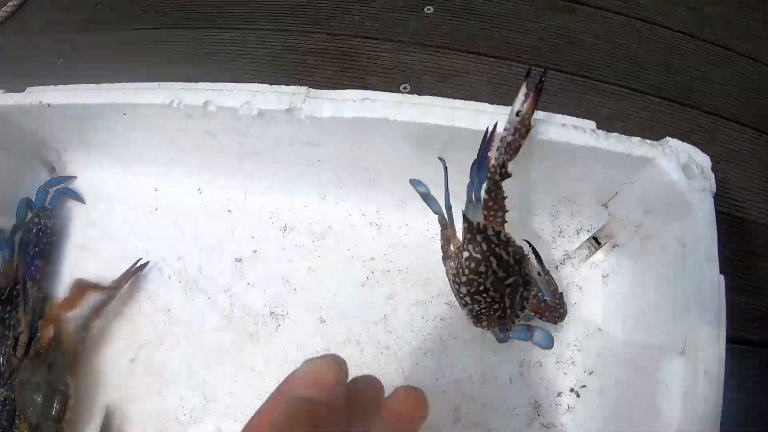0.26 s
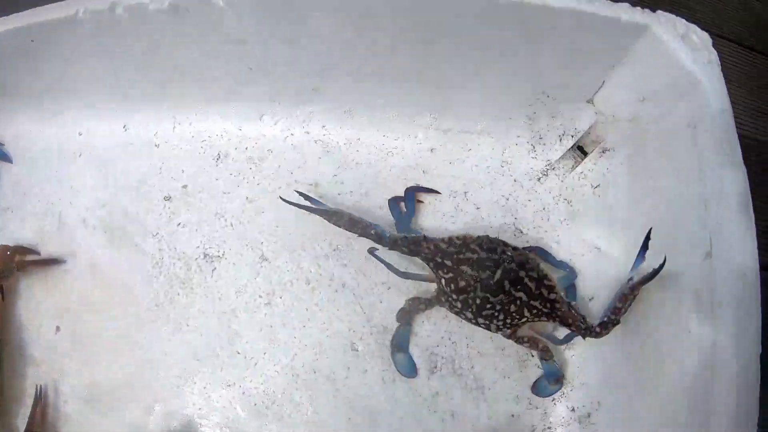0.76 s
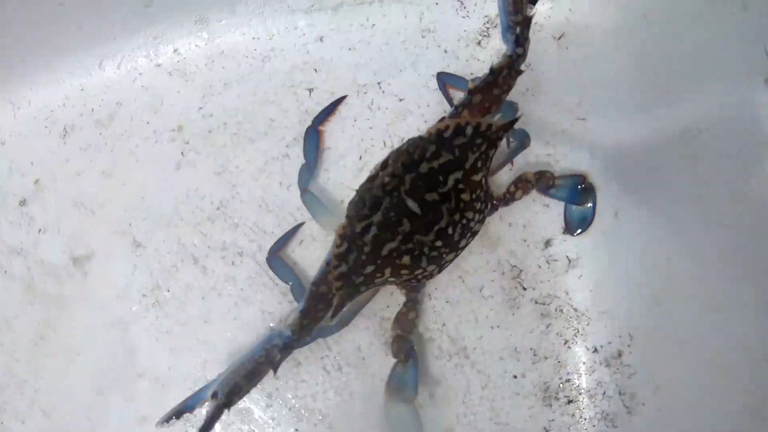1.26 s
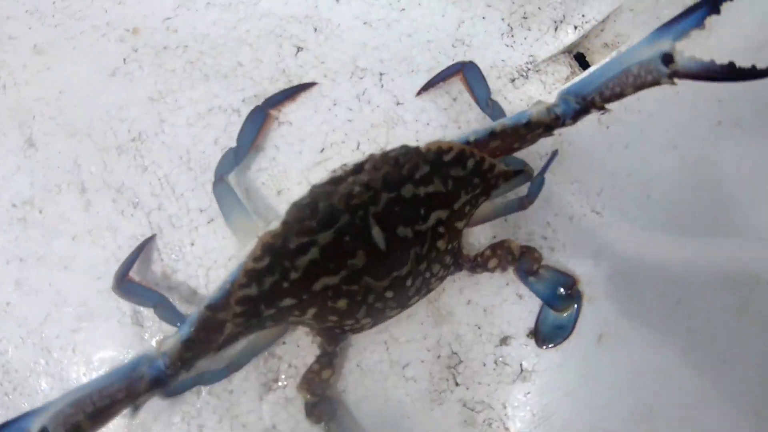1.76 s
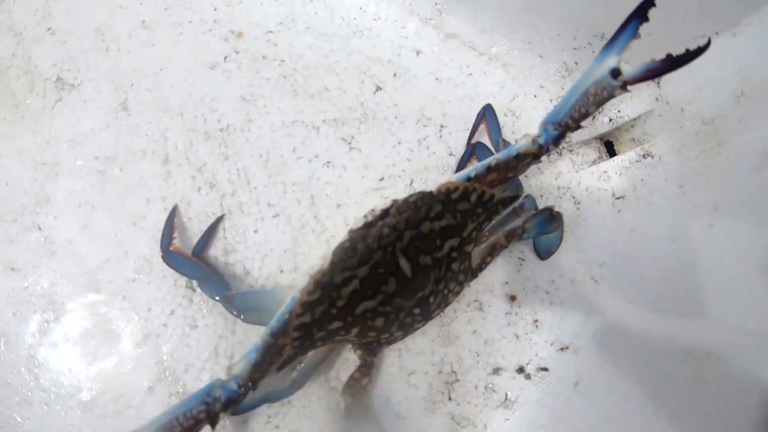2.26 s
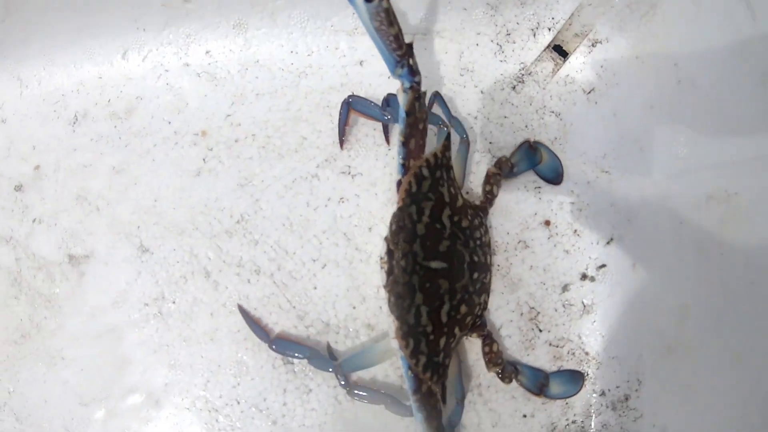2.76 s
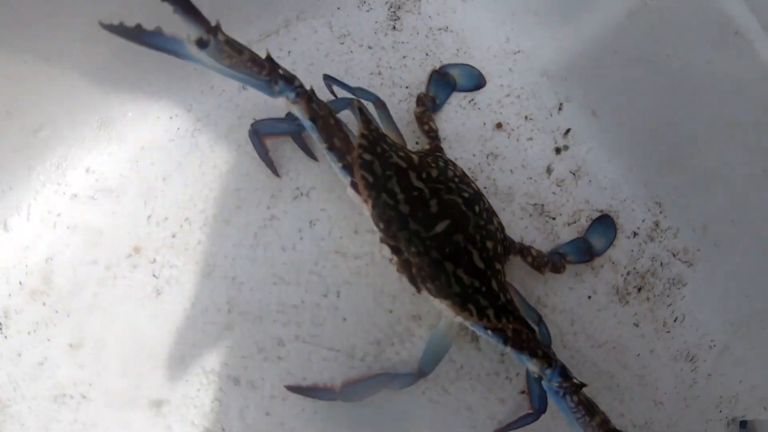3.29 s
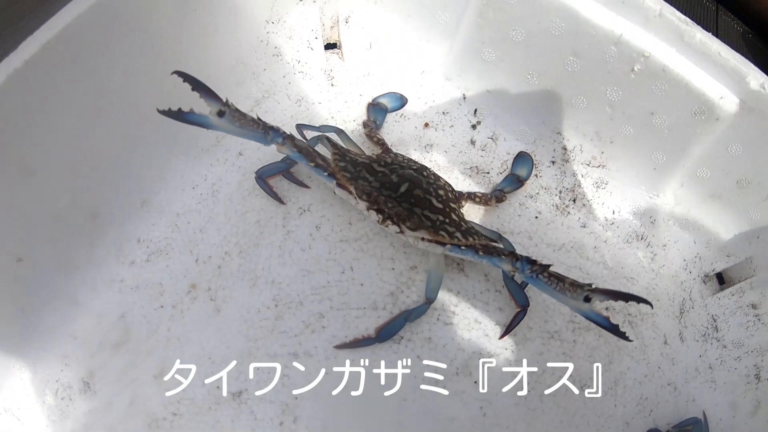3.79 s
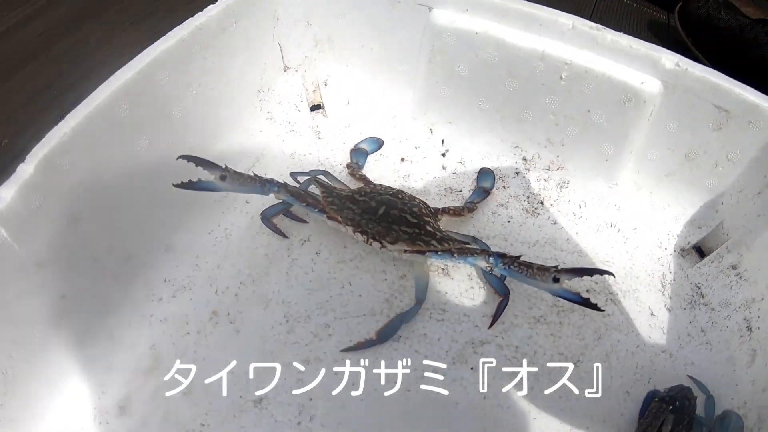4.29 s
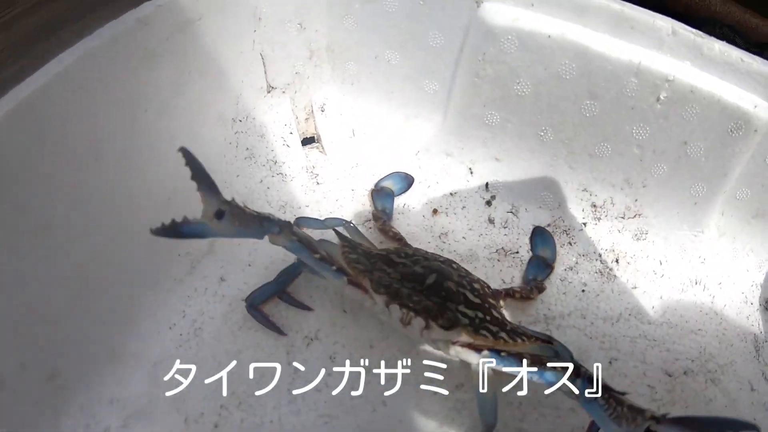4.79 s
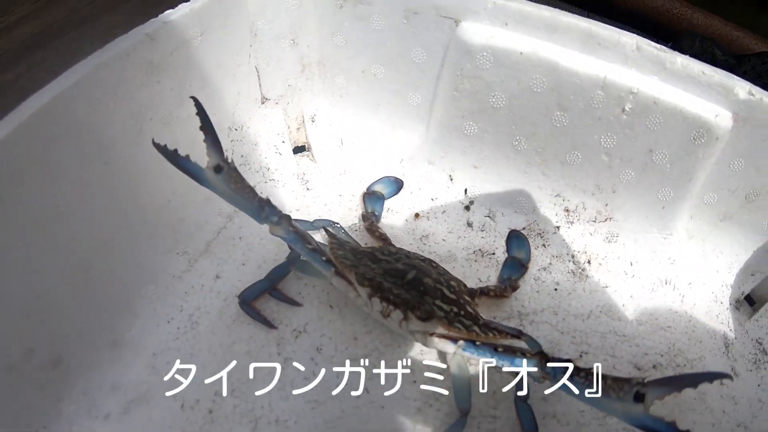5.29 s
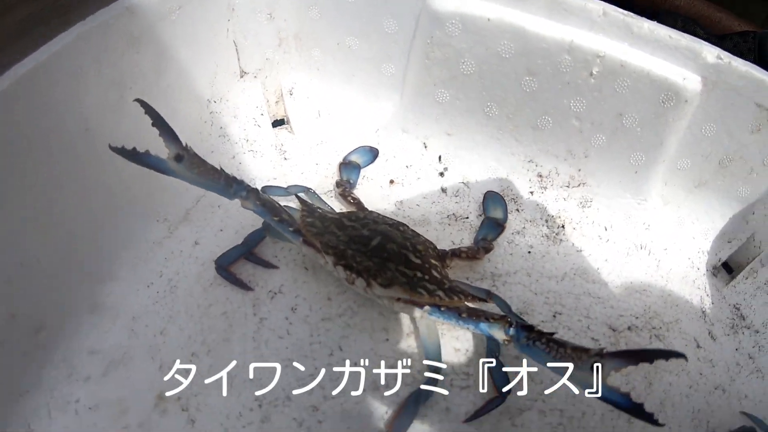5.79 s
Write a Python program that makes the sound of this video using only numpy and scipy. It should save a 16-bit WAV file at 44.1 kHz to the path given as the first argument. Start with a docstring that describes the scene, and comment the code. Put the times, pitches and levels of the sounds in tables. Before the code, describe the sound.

Outdoors near water, on a small microphone with dull treble. From 0 to 0.27 s wind rumbles and puffs, with two soft handling bumps, then total silence until about 0.37 s. A crab lands and skids in a foam box: light knocks from 0.4 s, the strongest hollow, low thuds at 0.67-0.72 and 0.84 s, the walls drumming briefly. From 1 to 3.7 s the wind is mostly low and the legs scrabble close by: dry scratches, short juddering groans near 1.5, 1.9, 2.1, 2.65 and 2.9 s, and crisp ticks, a strong one at 2.26 s. From 3.8 s grainy little laps of water join in. Wind builds from 4.4 s, rumbling, puffing and fizzing mostly on the right, with a bump at 4.97 s. A far gull mews at 5.24-5.9 s, rising then falling. Faint harbour wash continues underneath to 6 s.

```python
"""Wind buffets the microphone and handling bumps it; a live crab lands in a foam fish box with hollow knocks.
A brief silence cuts in early, then the body skids and the light walls drum, modelled as ringing modes.
The crab scrabbles on: its legs tick, judder and scratch over the foam beads, made from noise and clicks.
From 3.8 s water laps in short grainy bursts; then the wind, rumbling noise and puffs, returns and a far gull
calls once in swept partials. Distant water and harbour murmur throughout as coloured noise."""
import sys
import numpy as np
from scipy import signal
from scipy.fft import rfft, irfft, next_fast_len
from scipy.io import wavfile
from scipy.ndimage import uniform_filter1d

SR = 44100
rng = np.random.default_rng(int(sys.argv[2]) if len(sys.argv) > 2 else 0)


def log_audio(samples):
    """Write samples as a 16-bit WAV file to the path given in sys.argv[1]."""
    # one column per channel
    frames = np.atleast_2d(samples).T
    # limit to full scale, then quantise
    limited = np.clip(frames, -1, 1)
    pcm = np.round(limited * 32767).astype(np.int16)
    wavfile.write(sys.argv[1], SR, pcm)


N = 266805
TIME = np.arange(N) / SR  # seconds


def from_db(db):
    """Turn decibels into gain."""
    return 10 ** (np.asarray(db) / 20)


def rms_one(x):
    """Scale to an rms of 1."""
    return x / np.sqrt(np.mean(x ** 2) + 1e-20)


def peak_one(x):
    """Scale to a peak of 1."""
    return x / (np.abs(x).max() + 1e-20)


def in_time(rows):
    """Read each column of a curve at every sample."""
    s, *columns = np.transpose(rows)
    return [np.interp(TIME, s, column) for column in columns]


def at_hz(points, hz):
    """Read a spectrum on a log-frequency axis."""
    points = np.array(points)
    return np.interp(np.log(hz), np.log(points[:, 0]), points[:, 1])


def pan(db):
    """Give left and right gains that differ by db and have a mean of 1."""
    gains = from_db([[db / 2], [-db / 2]])
    return gains / gains.mean()


def add(out, s, sound):
    """Mix a short sound into out at s seconds."""
    at = max(round(s * SR), 0)
    out[..., at:at + sound.shape[-1]] += sound[..., :N - at]


def passband(x, hz, kind, order=2):
    """Apply a Butterworth filter."""
    sos = signal.butter(order, np.clip(hz, 10, .45 * SR), kind, fs=SR, output="sos")
    return signal.sosfilt(sos, x)


def colour(x, spectrum):
    """Filter causally (minimum phase) to follow a spectrum that falls away beyond its ends; rms 1."""
    size = next_fast_len(N + SR // 4)
    size += size % 2
    hz = np.maximum(np.arange(size // 2 + 1) * SR / size, 1)
    octaves_outside = np.abs(np.log2(hz / np.clip(hz, spectrum[0][0], spectrum[-1][0])))
    cepstrum = irfft(np.log(from_db(at_hz(spectrum, hz) - 20 * octaves_outside)), size)
    # keeping only the first half of the cepstrum, doubled, makes the filter causal
    response = np.exp(rfft(2 * cepstrum[:size // 2], size))
    return rms_one(irfft(rfft(x, size) * response, size)[..., :N])


def drift(rate):
    """Wander slowly at random with a spread of 1, by smoothing noise with two poles at rate Hz."""
    # one value per 40 samples; the first 2000 let the filter settle
    r = np.exp(-80 * np.pi * rate / SR)
    noise = rng.standard_normal(N // 40 + 2002)
    slow = signal.lfilter([1], [1, -2 * r, r * r], noise)[2000:]
    return np.interp(np.arange(N) / 40, np.arange(len(slow)), rms_one(slow))


def even(x, seconds):
    """Take the slow swells out of a noise and keep its fast texture."""
    power = np.abs(uniform_filter1d(x ** 2, max(int(seconds * SR), 1)))
    return x / np.sqrt(power + 1e-9)


# Hollow knocks: blows on the box walls, and a few bumps of handling at 0.08, 0.19 and 4.97 s.
# Each row: start of the crack in seconds, peak of the thud in dB, pitch of the thud in Hz,
# level of the crack in dB before crack_db is added, pitch of the crack in Hz.
KNOCKS = [(0.084, -26, 131, -45, 1410), (0.194, -22, 272, -43.5, 1600), (0.397, -18, 94, -49.5, 1700),
          (0.419, -16, 145, -42, 1400), (0.441, -22.5, 440, -46.5, 1510), (0.464, -24, 487, -35, 1150),
          (0.523, -22, 480, -56, 1090), (0.553, -23.5, 218, -40, 1500), (0.593, -22.5, 150, -38, 1450),
          (0.642, -19, 486, -33, 1500), (0.668, -6.5, 360, -33.5, 1150), (0.676, -7.5, 239, -44.5, 1050),
          (0.7169, -13, 418, -52, 895), (0.721, -7, 194, -58, 900), (0.81, -23, 452, -52.5, 1110),
          (0.84, -5.5, 313, -49, 930), (0.849, -9, 262, -53, 1040), (0.886, -22.5, 144, -71, 1100),
          (1.481, -26, 420, -47.5, 1400), (3.675, -31, 630, -54, 1110), (3.69, -29.5, 700, -53.5, 1500),
          (3.971, -32.5, 131, -43, 1420), (4.9638, -28.5, 235, -37.5, 1750), (4.9699, -32, 416, -34, 1830)]


def knocks(crack_t60=0.015, crack_db=12, grit=0.027, crack_width=1.185, thud_width=1.43,
           soft_hz=700, ringing=0.24, drumming=0.69, lead_s=0.0016):
    """Each knock is a low, brief push that rings the box modes, with a short pitched crack on top."""
    out = np.zeros(N)
    for s, db, hz, crack, crack_hz in KNOCKS:
        force = grit * crunch(0.0081)
        force[0] += 1
        push = passband(force, [hz / thud_width, hz * thud_width], "band")
        push = passband(push, soft_hz, "low", order=6)
        thud = peak_one(peak_one(push) + drumming * peak_one(walls(push)))
        grains = passband(crunch(crack_t60), [crack_hz / crack_width, crack_hz * crack_width], "band")
        snap = peak_one(peak_one(grains) + ringing * peak_one(walls(grains)))
        add(out, s - lead_s, from_db(db) * thud)
        add(out, s, from_db(crack + crack_db) * snap)
    return out


def crunch(t60):
    """A contact gives way in a burst of grains that fades by 60 dB in t60 seconds."""
    t = TIME[:SR // 4]
    return rng.standard_normal(len(t)) * from_db(-60 * t / t60)


# Notes the box rings with. Each row: pitch in Hz, relative level in dB, time to fade by 60 dB in seconds.
BOX = [(143, -21, 0.016), (182, 8, 0.064), (218, -4, 0.065), (306.4, 6.5, 0.061), (397, -1.5, 0.088),
       (485, -3, 0.082), (514, 4, 0.066), (643, 0, 0.081), (1082, -2.5, 0.13), (1140, -11.5, 0.058),
       (1412, -4, 0.04), (1550, -9.5, 0.025), (1750, -9, 0.018)]
MODE_SPREAD_DB = 2.5


def walls(force):
    """The box rings in its modes; each point of contact shares the force among them in its own way."""
    shares_db = MODE_SPREAD_DB * rng.standard_normal(len(BOX))
    modes = zip(BOX, shares_db)
    return sum(from_db(level + share) * ring(force, hz, t60) for (hz, level, t60), share in modes)


def ring(force, hz, t60):
    """A two-pole resonator answers a unit click with a dying sine that starts at height 1."""
    r, w = from_db(-60 / (t60 * SR)), 2 * np.pi * hz / SR
    return signal.lfilter([0, np.sin(w)], [1, -2 * r * np.cos(w), r * r], force + 1e-18)


# Colours of the parts of the scraping: drumming walls, rasp of the legs, scratch of the tips.
# Each row: frequency in Hz, relative density in dB per Hz.
DRUM = [(80, -7.5), (140, -2), (230, 2), (350, -2.5), (490, -5), (640, -7.5), (800, -15), (1200, -42.5)]
RASP = [(550, -31), (760, -3), (940, 2.5), (1080, 1.5), (1220, 6), (1400, -1.5), (1950, 0.5), (2700, -26.5)]
SCRATCH = [(1400, -6.5), (2200, -1), (3000, 4), (4100, 9.5), (5200, 1.5), (6500, -4), (8000, 0.5),
           (9500, -14.5), (11500, -46)]


def scraping(patchy_db=3.8, modal=0.42, lumps_db=1.0, bead_db=2.5, count=6):
    """Many legs slip at once: they rasp and hiss at the tips and drum unevenly in the walls."""
    drum, rasp, scratch = scrape_gains()
    drumming = colour(slips(), DRUM) + modal * rms_one(walls(slips()))
    # each leg has its own pitch, so the colour shifts as their levels wander
    forces = [slips(), slips()]
    legs = 0
    for k, hz in enumerate(np.geomspace(700, 3570, count)):
        leg = passband(forces[k % 2], [hz / 1.103, hz * 1.13], "band")
        legs = legs + leg * from_db(patchy_db * drift(33.0))
    tips = colour(slips(size_db=bead_db, clump_db=4.0), SCRATCH)
    lumpy_drum = drum * from_db(lumps_db * drift(17.0))
    parts = [(drumming, lumpy_drum), (colour(legs, RASP), rasp), (tips, scratch)]
    return sum(gain * even(part, 0.095) for part, gain in parts)


# The body skids as it lands: seconds, then levels in dB.
SKID_START_S, SKID_END_S, SKID_RELEASE_S = .38, 0.73, 0.055
SKID_DRUM_DB, SKID_RASP_DB, SKID_SCRATCH_DB = -37.5, -58, -85
# Bursts in STROKES pitched above this mostly scratch, those below it mostly rasp.
RASP_TO_SCRATCH_HZ = 2420
# How restlessly the legs shuffle between bursts. Each row: time in seconds, relative level in dB.
EFFORT = [(0.93, -63.5), (1.43, -60), (1.62, -55), (1.87, -61), (2.55, -55.5), (2.82, -59), (3.71, -55.5),
          (3.96, -61.5), (4.4, -54.5), (5.1, -59.5), (5.351, -60), (5.749, -65.5)]


def scrape_gains(drum_db=8, rasp_db=-1, scratch_db=-4, exposed_db=-8, stroke_rasp_db=-3,
                 stroke_scratch_db=-5):
    """A landing skid, then shuffling that thins in the open wind; each burst in STROKES adds a swell."""
    landed = TIME > SKID_START_S
    skid = landed * np.exp(-np.maximum(TIME - SKID_END_S, 0) / SKID_RELEASE_S)
    shuffle = landed * from_db(in_time(EFFORT)[0] + exposed_db * in_time(EXPOSURE)[0])
    drum, rasp, scratch = 0, 0, 0
    for s, length, db, hz, wall_db in STROKES:
        push = swell(s, length)
        shrill = 1 / (1 + (RASP_TO_SCRATCH_HZ / hz) ** 4)
        drum = drum + push * from_db(wall_db)
        rasp = rasp + push * from_db(db + stroke_rasp_db) * (1 - shrill)
        scratch = scratch + push * from_db(db + stroke_scratch_db) * shrill
    parts = [(SKID_DRUM_DB, drum_db, drum), (SKID_RASP_DB, rasp_db, rasp),
             (SKID_SCRATCH_DB, scratch_db, scratch)]
    gains = []
    for skid_db, shuffle_db, stroke in parts:
        steady = from_db(skid_db) * skid + from_db(shuffle_db) * shuffle
        gains.append(np.hypot(steady, stroke))
    return gains


def swell(s, length):
    """Rise and fall smoothly around s seconds, reaching zero length seconds to either side."""
    return np.cos(np.pi / 2 * np.clip((TIME - s) / length, -1, 1)) ** 4


def slips(per_s=1100, size_db=1.0, clump_db=5.0, rub=0.24):
    """Random clicks in clumps, like a point slipping over foam beads, on a smooth rub of noise."""
    sizes = from_db(size_db * np.minimum(rng.exponential(1, N), 5)) * rng.choice([-1, 1], N)
    force = sizes * (rng.random(N) < per_s / SR) + rub * rng.standard_normal(N)
    return force * from_db(clump_db * drift(27))


# Short grainy scratches of the legs and, from 3.8 s, laps of water near 1.3 kHz. Each row: middle in seconds,
# half-length in seconds, relative level in dB, pitch in Hz, level of the low drumming that goes with it in dB.
STROKES = [(0.408, 0.066, -59, 1900, -36), (0.48, 0.015, -54, 1790, -46), (0.553, 0.05, -73, 1600, -29),
           (0.68, 0.052, -54, 1080, -26.5), (0.817, 0.064, -49.5, 1080, -53), (1.118, 0.18, -58, 2200, -45),
           (1.204, 0.071, -51.5, 1170, -51.5), (1.443, 0.066, -49, 3460, -47),
           (1.495, 0.04, -47.5, 1770, -33), (1.611, 0.021, -52, 5760, -37),
           (1.776, 0.059, -54.5, 2180, -40), (1.863, 0.02, -46.5, 2210, -40), (1.966, 0.4, -61, 1780, -45),
           (2.131, 0.087, -49.5, 2370, -43), (2.39, 0.074, -57, 2000, -47),
           (2.506, 0.018, -59, 3480, -40.5), (2.649, 0.087, -49.5, 2600, -40.5),
           (2.882, 0.071, -50, 4170, -43), (3.014, 0.036, -48, 2880, -72), (3.196, 0.074, -58, 4670, -45.5),
           (3.364, 0.072, -47, 2020, -67), (3.61, 0.16, -50.5, 1580, -43.5),
           (3.794, 0.079, -51.5, 1960, -73), (3.862, 0.019, -47, 1250, -59), (4.063, 0.026, -57, 1370, -64),
           (4.152, 0.21, -62, 1260, -51.5), (4.235, 0.044, -46.5, 1700, -38.5),
           (4.376, 0.084, -57.5, 1350, -47.5), (4.475, 0.0097, -47, 1360, -54),
           (4.723, 0.17, -44, 1390, -44), (4.995, 0.062, -50, 6000, -46), (5.082, 0.026, -44, 1390, -40.5),
           (5.251, 0.043, -52, 1410, -48), (5.567, 0.04, -48.5, 2030, -49), (5.719, 0.043, -44, 1600, -48),
           (5.948, 0.051, -48, 1480, -43), (6.025, 0.043, -47, 1400, -43)]
STROKE_OCTAVES = 0.8  # width of the band


def strokes(stroke_db=-3, steady_s=0.032, lowest_hz=1080):
    """Scratches and laps are short, broad, grainy bursts of noise, each with a colour of its own."""
    out = np.zeros(N)
    force = even(slips(per_s=500, size_db=3.0, clump_db=2.5, rub=0.14), steady_s)
    spread = 2 ** (STROKE_OCTAVES / 2)
    for s, length, db, hz, _ in STROKES:
        start = max(s - length, 0)
        piece = force[int(start * SR):int((s + length) * SR)]
        burst = passband(piece, [hz / spread, hz * spread], "band", order=1)
        add(out, start, from_db(db + stroke_db) * rms_one(burst) * np.hanning(len(burst)) ** 2)
    return passband(out, lowest_hz, "high", order=6)


# A leg judders along the wall. Each row: middle in seconds, half-length in seconds, peak in dB,
# average slips per second.
JUDDERS = [(0.45, 0.018, -28, 370), (0.533, 0.017, -27.5, 340), (1.452, 0.026, -32.5, 397),
           (1.502, 0.024, -31, 405), (1.868, 0.019, -28.5, 335), (2.138, 0.037, -35.5, 340),
           (2.648, 0.035, -35.5, 350), (2.884, 0.017, -26, 510)]


def judders(jitter=0.14, width=1.39, drumming=0.54):
    """A leg sticks and slips in a quick, uneven run, and the wall groans at that rate."""
    out = np.zeros(N)
    for s, length, db, hz in JUDDERS:
        size = int(2 * length * SR)
        turns = np.cumsum(hz * (1 + jitter * drift(100)[:size])) / SR
        clicks = np.diff(np.floor(turns), prepend=0)  # one slip per whole turn
        push = passband(clicks, [hz / width, hz * width], "band") * np.hanning(size) ** 2
        push = np.pad(push, (0, SR // 10))  # room for the walls to ring on
        add(out, s - length, from_db(db) * peak_one(peak_one(push) + drumming * peak_one(walls(push))))
    return out


# Ticks pitched above this ring briefly, near the resonance of the microphone port.
TICKS_RING_ABOVE_HZ = 4400
# Lighter ticks fall at random; their levels before tick_db and lift are set relative to EFFORT.
SMALL_TICK_DB, SMALL_TICK_SPREAD_DB, SMALL_TICK_HZ = 7, 4, (1800, 5000)
# Leg tips snapping off the foam. Each row: start in seconds, relative peak in dB, pitch in Hz.
TICKS = [(0.199, -43.5, 6400), (0.5884, -40, 3200), (1.063, -44.5, 3630), (1.4301, -39, 2480),
         (1.478, -42, 3770), (1.533, -42, 2070), (1.6052, -43, 5200), (1.6446, -40, 1890),
         (1.8894, -42.5, 5530), (2.2567, -43, 3520), (2.2615, -32, 2110), (2.2987, -46, 4580),
         (2.3845, -43, 3250), (2.4967, -38.5, 3200), (2.6239, -40, 3000), (2.654, -35, 2980),
         (2.8694, -32.5, 2600), (3.012, -35.5, 2780), (3.095, -42, 1900), (3.1112, -39, 2440),
         (3.258, -39, 5360), (3.6064, -39, 3040), (4.2248, -39, 3000), (4.5724, -36.5, 5320),
         (4.9632, -37, 3960), (5.5559, -40, 5470), (5.6092, -34.5, 5360), (5.7484, -40, 5330),
         (5.7882, -41.5, 3720), (5.8461, -40, 2340), (5.9651, -35, 2540)]


def ticks(tick_db=1, grain_t60=0.01, ring_t60=0.008, dry=0.083, side_db=-9, port_db=1.5,
          rise_s=0.0025, count=22):
    """A leg tip slips with a dry snap; the highest ring briefly, near the microphone port's resonance."""
    out = np.zeros((2, N))
    low, high = SMALL_TICK_HZ
    times, effort_db = np.transpose(EFFORT)
    when, size, pitch = rng.random((count, 3)).T
    when = times[0] + when * (times[-1] - times[0])
    small_db = np.interp(when, times, effort_db) + SMALL_TICK_DB + SMALL_TICK_SPREAD_DB * (2 * size - 1)
    small = zip(when, small_db, low * (high / low) ** pitch)
    for s, db, hz in list(TICKS) + list(small):
        burst = crunch(grain_t60)
        grains = burst * (1 - np.exp(-TIME[:len(burst)] / rise_s))
        tick = peak_one(passband(grains, [hz / 2, hz * np.sqrt(2)], "band"))
        if hz > TICKS_RING_ABOVE_HZ:
            tick = dry * tick + peak_one(ring(grains, hz, ring_t60))
        exposure = np.interp(s, *np.transpose(EXPOSURE))
        # the open port favours ticks near its own resonance
        lift = port_db * exposure * from_db(at_hz(PORT, hz))
        add(out, s, from_db(db + tick_db + lift) * peak_one(tick) * pan(side_db * exposure))
    return out


GULL_DB = -57  # added to the level column and to the throat
# The cry. Each row: time in seconds, pitch in Hz before it wavers, relative level in dB.
GULL = [(5.24, 1000, -22), (5.285, 1035, 0), (5.345, 1127, 4), (5.365, 1070, -3), (5.38, 1040, 2),
        (5.395, 950, -1), (5.42, 912, -2), (5.54, 882, 0), (5.585, 836, 1), (5.655, 811, 3), (5.71, 821, 0),
        (5.77, 828, -11), (5.9, 840, -20)]
# Resonances of the throat. Each row: frequency in Hz, relative level in dB.
GULL_THROAT = [(820, -1), (1100, -8), (1630, 15), (1680, 10), (1780, 0), (2200, -7), (2450, -8), (2670, 1),
               (3250, -6), (3380, -4), (3600, -8), (4400, -20)]
# The cry meets the two ports largely out of step.
# Each row: frequency in Hz, left minus right in dB, lead of the left in radians.
GULL_ARRIVAL = [(850, 7, 2.7), (1100, 4, 1.5), (1630, 2, 2.8), (2650, -5, 2.5), (3300, -1, 1.7)]


def gull(waver=0.0042, count=4):
    """A mewing cry rises, breaks down and trails off; it swells as partial 2 meets the throat's resonance."""
    pitch, level = in_time(GULL)
    pitch = pitch * (1 + waver * drift(94))
    phase = 2 * np.pi * np.cumsum(pitch) / SR
    arrival = np.array(GULL_ARRIVAL)
    cry, sides = 0, np.array([[.5], [-.5]])
    for k in range(1, count + 1):
        balance_db = at_hz(arrival[:, [0, 1]], k * pitch)
        lead = at_hz(arrival[:, [0, 2]], k * pitch)
        partial_db = at_hz(GULL_THROAT, k * pitch) + drift(13) + sides * balance_db
        cry = cry + from_db(partial_db) * np.sin(k * phase + sides * lead)
    return from_db(GULL_DB + level) * cry * (TIME > GULL[0][0]) * (TIME < GULL[-1][0])


# The fizz across the port: its level in dB before flutter, panning and exposure when the WIND table reads
# GUST_DB, and the share of the wind's swing that it follows.
FIZZ_DB, GUST_DB, FIZZ_FOLLOWS = -56, -18.5, 0.39
# Strength of the wind. Each row: time in seconds, relative level of the rumble in dB.
WIND = [(0, -22.5), (.26, -25.5), (.45, -36), (.9, -40.5), (1.03, -57), (1.75, -54.5), (1.95, -42),
        (2.2, -50), (2.38, -39), (2.8, -55), (3.5, -59), (4.1, -42), (4.6, -30.5), (4.75, -27),
        (4.94, -31.5), (5.1, -25.5), (5.35, -34.5), (5.42, -42), (5.5, -30.5), (5.58, -39.5), (5.67, -19.5),
        (5.8, -29), (5.92, -24), (6.05, -33)]
# Colour of the rumble. Each row: frequency in Hz, relative density in dB per Hz.
RUMBLE = [(11, 4), (18, 3.5), (40, 5.5), (77, -4), (140, -15), (200, -27.5), (286, -34.5), (354, -43.5),
          (424, -40), (659, -47.5), (900, -64), (1170, -85.5), (1980, -120)]
# Single puffs of air. Each row: middle in seconds, peak in dB before panning, pitch in Hz.
PUFFS = [(0.075, -20, 9.9), (0.214, -19, 98), (0.244, -17, 11.9), (1.952, -31, 102), (2.452, -32.5, 117),
         (2.684, -29.5, 90), (3.744, -38, 41), (4.391, -29.5, 170), (4.534, -23.5, 72), (4.724, -17.5, 77),
         (4.764, -19.5, 69), (5.7, -19, 33.3), (5.952, -24.5, 128)]
# Colour of the air across the port. Each row: frequency in Hz, relative density in dB per Hz.
PORT = [(3000, -16), (4400, -15.5), (5400, -2), (6300, -7), (7500, -17.5), (9000, -22.5), (11000, -34)]


def wind(exposure, wind_db=-1, lumps_db=2, side_db=-9.0, fizz_side_db=-13, flutter_db=4.0,
         puff_cycles=0.94):
    """Eddies rumble and puff, mostly on the right port; after the skid, gusts also fizz across its opening."""
    level, = in_time(WIND)
    eddies = even(two_ports(RUMBLE, exposure, alike=0.55), 0.28)
    rumble = from_db(level + wind_db) * eddies * from_db(lumps_db * drift(12.0))
    for s, db, hz in PUFFS:
        cycles = np.clip(hz * (TIME - s), -4, 4)
        puff = np.sin(2 * np.pi * cycles) * np.exp(-(cycles / puff_cycles) ** 2)
        rumble = rumble + from_db(db) * peak_one(puff)
    rumble = rumble * (1 + exposure * (pan(side_db) - 1))
    fizz_db = FIZZ_DB + FIZZ_FOLLOWS * (level - GUST_DB) + flutter_db * drift(26)
    fizz = from_db(fizz_db) * colour(rng.standard_normal((2, N)), PORT)
    return rumble + fizz * pan(fizz_side_db) * exposure * (TIME > SKID_END_S)


def two_ports(spectrum, exposure, alike):
    """Both ports share the noise in shelter; in the open, part of it differs between them."""
    shared, own = rng.standard_normal(N), rng.standard_normal((2, N))
    apart = exposure * (1 - alike)
    return colour(np.sqrt(1 - apart) * shared + np.sqrt(apart) * own, spectrum)


# Colour of the distant water and harbour. Each row: frequency in Hz, relative density in dB per Hz.
HARBOUR = [(100, 6.5), (400, -14.5), (600, -23), (710, -7), (830, -21), (1010, -16.5), (1130, -8),
           (1400, -9), (2200, -10.5), (4000, -18.5), (6200, -22), (9000, -33)]
# The wash of the water. Each row: time in seconds, level in dB before the lapping.
HARBOUR_DB = [(0, -58.5), (0.26, -59), (0.4, -63), (3.5, -59), (4.6, -54.5), (5.4, -56), (5.8, -55)]


def harbour(exposure, lapping_db=4.5):
    """Far water and harbour make a steady coloured noise whose level wanders as the water laps."""
    level, = in_time(HARBOUR_DB)
    return from_db(level + lapping_db * drift(13.2)) * two_ports(HARBOUR, exposure, alike=0.18)


# How differently the two ports hear the scene. Each row: time in seconds, exposure from 0 to 1.
EXPOSURE = [(0, .75), (.27, .75), (.38, 0), (3.95, 0), (4.55, 1), (6.05, 1)]


def scene(lag_s=0.00025, bass_hz=650, bass_side_db=-8):
    """As exposure opens the stereo image, the near sounds reach the right first and their bass leans there."""
    exposure, = in_time(EXPOSURE)
    near = knocks() + judders() + scraping() + strokes()
    bass = passband(near, bass_hz, "low", order=1)
    # exposure also lifts the bass, most on the right
    left, right = near + exposure * (pan(bass_side_db) - 0.5) * bass
    late_left = np.interp(TIME - lag_s * exposure, TIME, left)
    near = np.array([late_left, right]) + ticks()
    return near + gull() + wind(exposure) + harbour(exposure)


CUTOFF_HZ = 15000
# A brief silence. Each row: time in seconds, gain.
PAUSE = [(0, 1), (.2668, 1), (.26681, 0), (.372, 0), (.39, 1), (6.05, 1)]


def record(dry, dull_hz=9200):
    """A dull little microphone loses the treble; the sound breaks off for a tenth of a second early on."""
    sound = passband(dry, dull_hz, "low", order=5) * in_time(PAUSE)[0]
    return passband(sound, CUTOFF_HZ, "low", order=12)


dry = scene()
out = record(dry)
log_audio(out)
```